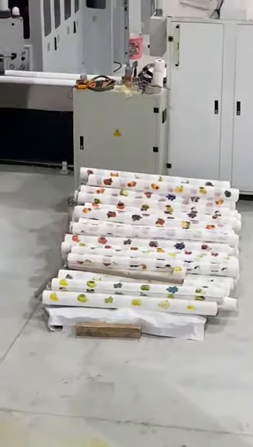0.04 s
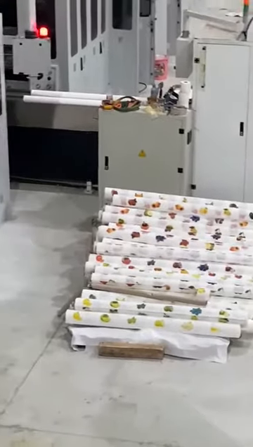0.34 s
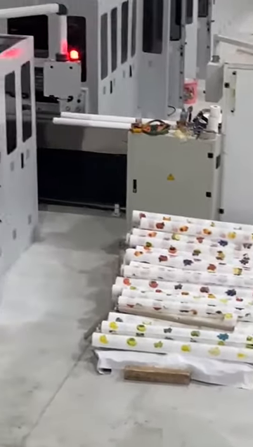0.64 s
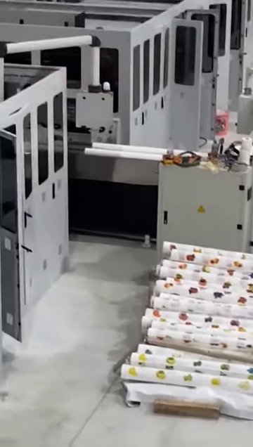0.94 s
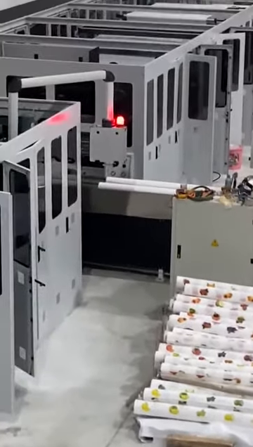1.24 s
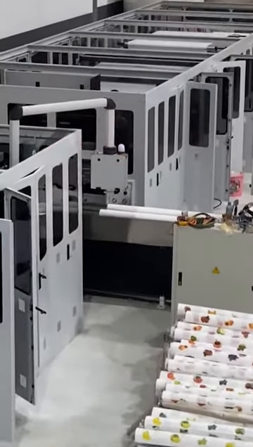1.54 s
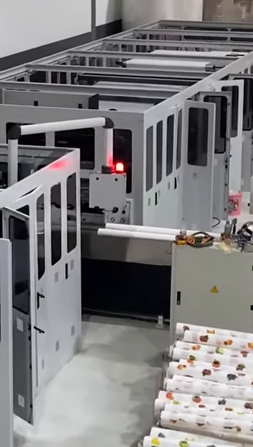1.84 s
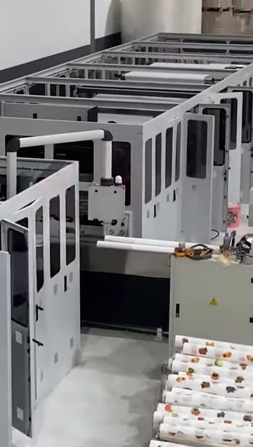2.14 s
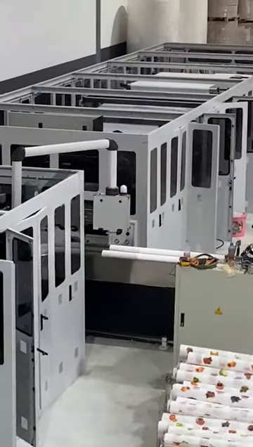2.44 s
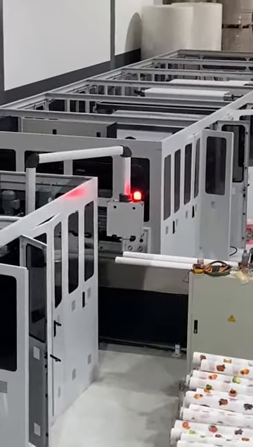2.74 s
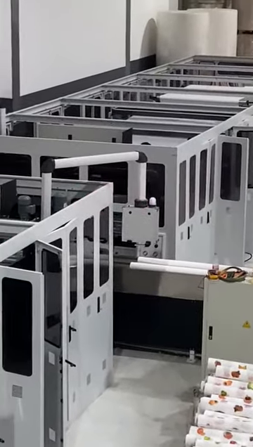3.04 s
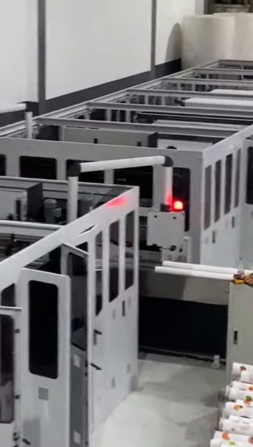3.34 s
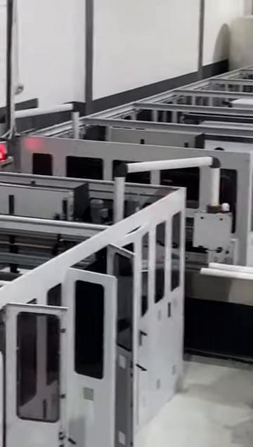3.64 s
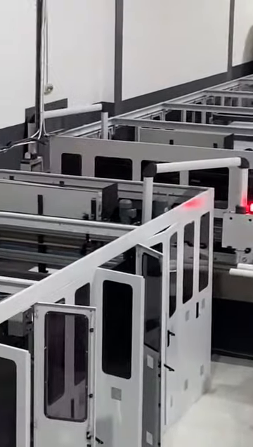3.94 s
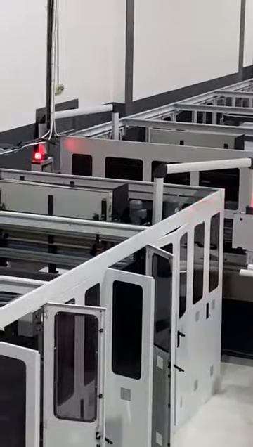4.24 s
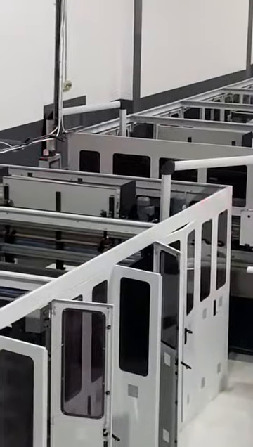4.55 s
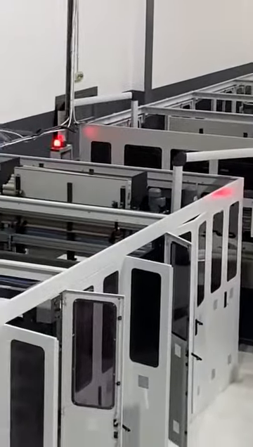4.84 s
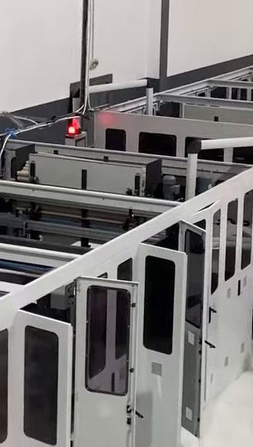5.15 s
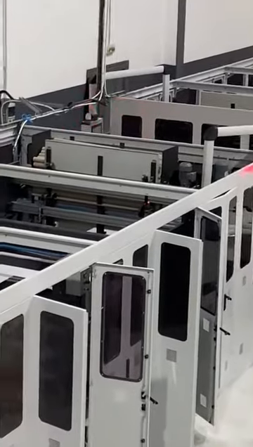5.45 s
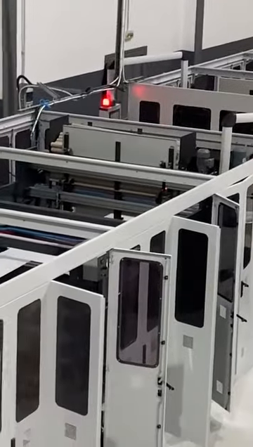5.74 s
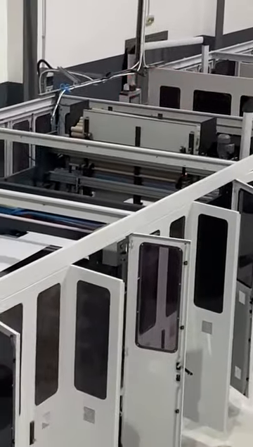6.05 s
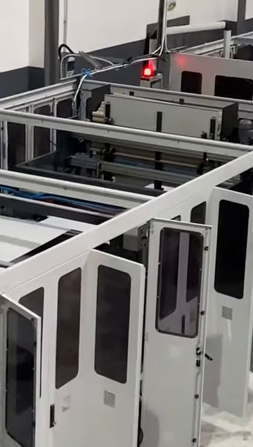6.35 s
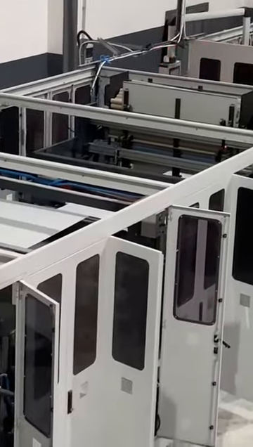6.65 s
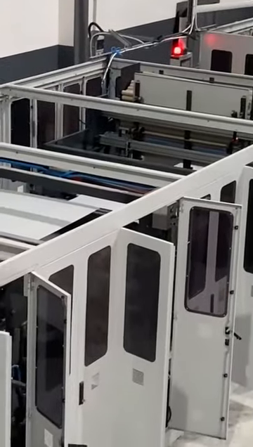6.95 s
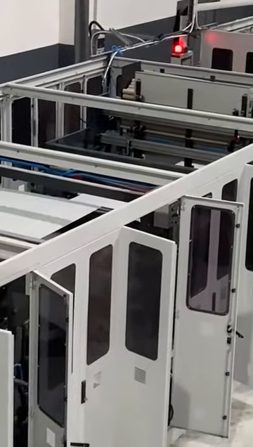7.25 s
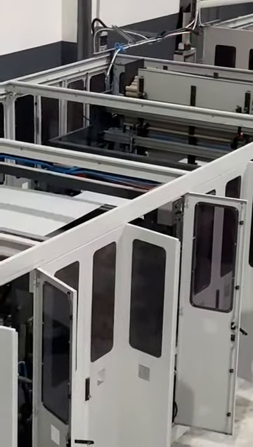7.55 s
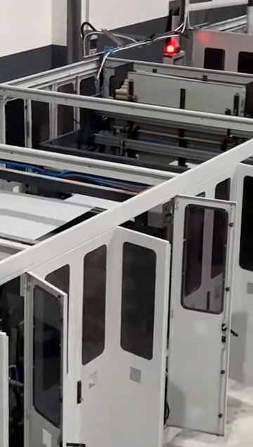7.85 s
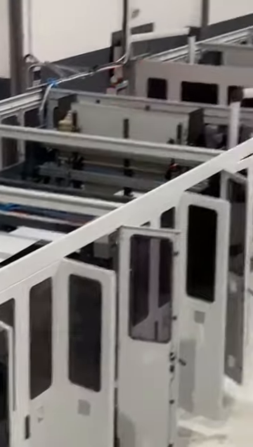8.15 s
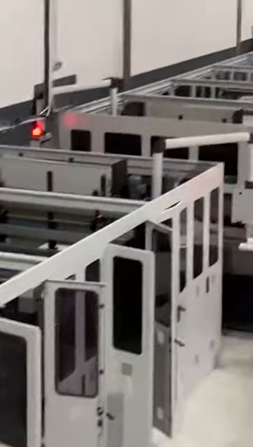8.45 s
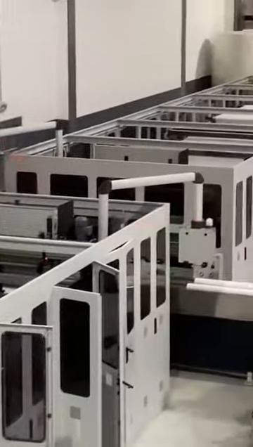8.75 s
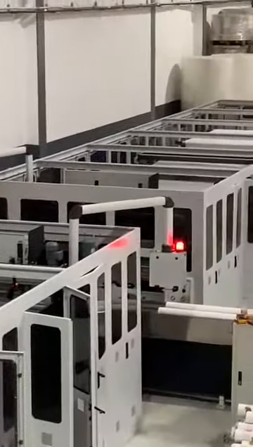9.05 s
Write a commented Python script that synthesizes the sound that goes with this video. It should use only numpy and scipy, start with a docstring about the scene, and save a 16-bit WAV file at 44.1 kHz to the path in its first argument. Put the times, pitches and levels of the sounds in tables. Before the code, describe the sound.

A large paper machine runs at an even speed in a factory hall. Its low hum and throbbing roller rumble dominate, with fainter motor and gear whines and the soft hiss of moving paper above. A panel rings briefly about three seconds in and again later; near the end come faint high squeaks and a soft paper scrape. The whines shift slightly as the microphone turns.

```python
"""Paper line in a factory hall

A paper machine runs at a steady speed, heard from a slowly moving viewpoint above it.
Its main shaft hums and shakes the frame; two drives whine and beat, shifting as the viewpoint turns.
Rollers rumble and the moving sheet of paper hisses. Now and then a dry guide squeaks
or a panel rings, and near the end the paper scrapes over an edge."""
import sys
import numpy as np
from scipy.fft import rfft, irfft, next_fast_len
from scipy.io import wavfile
from scipy.ndimage import map_coordinates

SR = 44100
rng = np.random.default_rng(int(sys.argv[2]) if len(sys.argv) > 2 else 0)


def transcribe(signal):
    """Save signal, clipped to [-1, 1], as a 16-bit WAV file at the path in sys.argv[1]."""
    frames = np.atleast_2d(signal).T
    limited = np.clip(frames, -1, 1)
    pcm = np.round(limited * 32767).astype(np.int16)
    wavfile.write(sys.argv[1], SR, pcm)


N = 410129
TIME = np.arange(N) / SR
SHAFT_HZ, MOTOR_HZ, GEAR_HZ = 12.503, 124.78, 220.5


def amp(db):
    """Turn decibels into a gain."""
    return 10 ** (np.asarray(db) / 20)


def along(points, hz):
    """Read between the (f/Hz, value) rows of a table, with octaves evenly spaced."""
    f, value = np.transpose(points)
    return np.interp(np.log(hz + 1), np.log(f + 1), value)


def wobble(rate):
    """A smooth random curve through `rate` new values a second."""
    times = np.linspace(0, N / SR, 1024)
    curve = map_coordinates(rng.standard_normal(size=512), [times * rate], mode="wrap")
    return np.interp(TIME, times, curve)


def filtered(x, response):
    """Multiply each frequency in x by response(hz)."""
    size = next_fast_len(N + SR // 4, True)
    return irfft(rfft(x, size) * response(np.fft.rfftfreq(size, 1 / SR)), size)[..., :N]


def facing(near_db, far_db):
    """The dB gained as the viewpoint turns to the near unit, then to the far end of the line."""
    def turn(start_s, length_s):
        return np.sin(np.pi / 2 * np.clip((TIME - start_s) / length_s, 0, 1)) ** 2
    return near_db * turn(2.4, 2.4) + far_db * turn(8.05, 0.64)


# How far a tone's phase strays at each microphone: f/Hz, angle/rad
PHASE_STRAY = [(80, .01), (250, 0.053), (600, .11), (900, 0.28), (1200, .26), (1500, 0.41), (2000, .1)]
def tone(hz, drift):
    """A stereo tone whose phase drifts in the hall's standing waves, a little differently per side."""
    cycles = hz * TIME + rng.random()
    phase = 2 * np.pi * (cycles % 1) + drift * wobble(1.595)
    stray = along(PHASE_STRAY, hz) * wobble(1.485)
    return np.sqrt(2) * np.cos([phase + stray, phase - stray])


def whine(hz, db, near_db, far_db):
    """A tone that slowly swells and fades in the hall and follows the turns; high ones waver most."""
    waver_db = 1.54 * hz / 1000 * wobble(5)
    return amp(db + facing(near_db, far_db) + waver_db + 0.8 * wobble(1.28)) * tone(hz, drift=0.2)


# How alike noise is on the left and right: f/Hz, likeness (1 = fully alike)
LIKENESS = [(80, .9999), (200, 1), (400, 0.98), (600, .975), (800, 0.91), (1200, 0.78), (1620, 0.48),
            (2000, 0.98), (2600, 0.99), (3200, .999), (4000, 1), (4450, 0.95), (5000, 0.9), (5400, 1),
            (6000, 0.61), (6600, 1), (8200, 1), (8950, .55), (9900, .998), (11600, 0.96)]
# How far the left side runs ahead: f/Hz, angle/rad
LEFT_LEAD = [(500, 0), (950, .2), (1700, -.3), (2200, .1), (5300, .05), (5650, .65), (6000, 1.55),
             (6350, 2.4), (6600, 3.14), (8200, 3.14), (8650, 3.9), (8950, 4.7), (9300, 5.8), (9900, 6.28)]
def rush(colour):
    """Stereo noise shaped by colour(hz), as two close microphones hear it, scaled to rms 1."""
    def mid_and_side(hz):
        spread = np.arccos(np.clip(along(LIKENESS, hz), -1, 1)) / 2
        return colour(hz) * [np.cos(spread), np.sin(spread)]
    mid, side = filtered(rng.standard_normal((2, N)), mid_and_side)
    pair = np.array([mid + side, mid - side])
    pair = filtered(pair, lambda hz: np.exp(1j * np.array([[.5], [-.5]]) * along(LEFT_LEAD, hz)))
    return pair / np.sqrt(np.mean(pair ** 2))


def noise(points):
    """Stereo noise shaped by a table of f/Hz, relative level/dB."""
    return rush(lambda hz: amp(along(points, hz)))


# The two main hum tones: multiple of the shaft speed, level/dB
HUM_TONES = [(6, -37.7), (12, -40.3)]
def shaft_hum(angle):
    """Six pushes in each turn of the shaft make a low hum."""
    out = np.zeros(N)
    for multiple, db in HUM_TONES:
        level = amp(db + facing(near_db=-0.9, far_db=0.2) + 0.25 * wobble(3.1))
        out += level * np.sqrt(2) * np.cos(round(multiple) * angle)
    return out


# The frame's strongest vibrations: multiple of the shaft speed, level/dB
FRAME_TONES = [(3, -67), (4, -63.5), (5, -56.5), (7, -58.5), (8, -66.5), (9, -54.5), (11, -57), (13, -59.5),
               (14, -64), (15, -64.5), (16, -62), (21, -60), (22, -59.5), (38, -74), (42, -63.5),
               (44, -70.5), (45, -70), (47, -69.5), (48, -68.5), (52, -74), (54, -72.5), (55, -73),
               (58, -71), (59, -76.5), (60, -75), (66, -77), (71, -73.5), (75, -78.5), (80, -79.5),
               (81, -79.5), (93, -75.5), (120, -79), (126, -80)]
def frame():
    """The frame shakes along with the shaft, each tone fading in and out on its own."""
    return sum(amp(db + 2 * wobble(2.6)) * tone(round(multiple) * SHAFT_HZ, drift=0.32)
               for multiple, db in FRAME_TONES)


# The outline of the rattle's many weak tones: f/Hz, relative level/dB
RATTLE_SHAPE = [(320, -75), (600, -77), (900, -78.5), (1200, -83), (1700, -88.5), (2200, -89),
                (2700, -103.5)]
def gear_teeth(angle):
    """The teeth repeat one rattle every turn; it arrives by four paths that slowly trade strength."""
    multiples = np.arange(25, 216)
    one_turn = np.linspace(0, 2 * np.pi, 2048)
    shares = np.array([wobble(0.7) for path in range(4)])
    out = np.zeros(N)
    for share in shares / np.linalg.norm(shares, axis=0):
        sizes = amp(along(RATTLE_SHAPE, multiples * SHAFT_HZ)) * rng.standard_normal(len(multiples))
        phases = 2 * np.pi * rng.random((len(multiples), 1))
        rattle = sizes @ np.cos(multiples[:, None] * one_turn + phases)
        out += 1.4 * share * np.interp(angle % (2 * np.pi), one_turn, rattle)
    return out


# The motor's tones: multiple of its speed, level/dB, near-turn gain/dB, far-turn gain/dB
MOTOR_TONES = [(2, -53, -0.5, -4.5), (4, -66, -0.5, 2), (5, -74, -0.5, -3), (6, -71, 5, 0.5),
               (9, -78, 2, -5), (10, -72.5, -4.5, 9.5), (18, -86, 0, 3), (20, -88.5, 1, 4)]
# How its clearest whines, at 7, 8, 11 and 12 times its speed, swell and fade: t/s, level/dB
SWELL_7 = [(0, -79), (2.2, -75), (2.9, -70), (3.9, -66.5), (4.6, -61.5), (6.2, -62), (6.9, -63.5),
           (7.5, -61), (8.3, -61.5), (9.3, -62)]
SWELL_8 = [(0, -71.5), (1.0, -68), (2.6, -73), (4.2, -73), (4.6, -67), (5.5, -79), (8, -79), (8.3, -68),
           (8.7, -63.5), (9.0, -66.5), (9.3, -64)]
SWELL_11 = [(0, -85), (5, -84), (5.8, -77), (6.8, -79), (7.5, -72), (8, -72.5), (8.4, -76), (9, -70),
            (9.3, -72)]
SWELL_12 = [(0, -79), (1.2, -79), (1.6, -69.5), (3.5, -73.5), (5, -81), (6.5, -75), (7.1, -72), (8, -69.5),
            (8.4, -76), (8.7, -74), (9.3, -76)]
def motor():
    """The drive motor whines at whole multiples of its speed."""
    out = sum(whine(round(multiple) * MOTOR_HZ, *levels) for multiple, *levels in MOTOR_TONES)
    for multiple, swell in ((7, SWELL_7), (8, SWELL_8), (11, SWELL_11), (12, SWELL_12)):
        db = np.interp(TIME, *np.transpose(swell)) + 1.1 * wobble(7)
        out += amp(db) * tone(multiple * MOTOR_HZ, drift=0.2)
    return out


def pinion(teeth):
    """The small gear on the shaft sings at the rate its teeth meet."""
    return whine(teeth * SHAFT_HZ, db=-51.5, near_db=-3, far_db=-1)


# The roller gear's tones: multiple of GEAR_HZ, level/dB, near-turn gain/dB, far-turn gain/dB
GEAR_TONES = [(1, -61.5, 0, 0), (2, -66, 2, 0), (3, -79.5, -1, -3), (4, -68.5, 2.5, 2), (5, -75.5, 1.5, 0)]
def roller_gear():
    """The gear whines; its fourth multiple lies so near the motor's seventh that the two beat."""
    return sum(whine(round(multiple) * GEAR_HZ, *levels) for multiple, *levels in GEAR_TONES)


# Fan and bearing tones: f/Hz, level/dB, near-turn gain/dB, far-turn gain/dB
FAN_TONES = [(83.2, -57.5, 0, 0), (180, -64.5, 0, 0), (417.5, -70.5, 0, 0), (533.2, -74, 0, 0),
             (581.7, -72, 0, 0), (703.5, -70, 3.5, -4), (1185.6, -74, 3, 3), (2074.5, -81, 0, 0)]
def fans():
    """Spinning fans and bearings each add a lone tone."""
    return sum(whine(*row) for row in FAN_TONES)


# The rollers' deep rumble, higher whirr and drumming: f/Hz, relative level/dB
RUMBLE_SHAPE = [(15, -18.5), (33, -19), (43, -3.5), (63, 2), (85, 0), (105, -2), (155, 1), (220, -3.5),
                (285, -8.5), (340, -15), (600, -59)]
WHIRR_SHAPE = [(200, -21), (320, 0.5), (430, 0.5), (620, -5), (880, -5.5), (1050, -18), (1600, -53)]
DRUM_SHAPE = [(150, -38.5), (205, -3), (250, 2), (270, -2), (300, -13), (360, -43.5)]
def rollers():
    """The rollers drum unevenly, and their rumble and whirr throb once per turn of the shaft."""
    throb = np.cos(2 * np.pi * SHAFT_HZ * TIME)
    rumble = amp(-43.5 + 1.1 * throb + 0.7 * wobble(5.5)) * noise(RUMBLE_SHAPE)
    whirr_db = -53.5 + facing(near_db=-0.3, far_db=1.3) + 0.7 * throb + 0.36 * wobble(8.7)
    whirr = amp(whirr_db) * noise(WHIRR_SHAPE)
    drumming = amp(-55 + 2.9 * wobble(7)) * noise(DRUM_SHAPE)
    return rumble + whirr + drumming


# The paper's rush and its high hiss: f/Hz, relative level/dB
RUSH_SHAPE = [(600, -22), (1000, -1), (1280, 2.5), (1430, -2), (1800, -6.5), (2150, -6.5), (2700, -11),
              (3600, -27), (6000, -58)]
HISS_SHAPE = [(1500, -25), (2800, 2.5), (3500, 1.5), (5600, 0.5), (7000, -1.5), (8000, -7), (9000, -9.5),
              (10200, -8.5), (11200, -18), (11800, -30)]
def paper():
    """The sheet rushes over the rollers, loudest toward the far end."""
    rush_db = -61 + facing(near_db=0.85, far_db=2) + 0.43 * wobble(10)
    hiss_db = -64 + facing(near_db=-0.8, far_db=1.1) + 0.08 * wobble(1.6) + 0.17 * wobble(14)
    return amp(rush_db) * noise(RUSH_SHAPE) + amp(hiss_db) * noise(HISS_SHAPE)


def burst(start, db, fade_s, rise_s):
    """The level of a sound that builds up and dies away in the hall, losing 60 dB in fade_s."""
    age = np.maximum(TIME - start, 0)
    return amp(db - 60 * age / fade_s) * (1 - np.exp(-age / rise_s))


def rubbed(events, resonances, rise_s, flutter_db):
    """Rubbing makes a part ring in fluttering bursts of noise; overlapping bursts add their power."""
    def body(f):
        return sum(amp(db) * np.abs(f * width / (hz * hz - f * f + 1j * f * width)) ** 1.7
                   for hz, width, db in resonances)
    swell = np.sqrt(sum(burst(*event, rise_s) ** 2 for event in events))
    return swell * amp(flutter_db * wobble(40)) * rush(body)


# Thin, high squeaks: t/s, f/Hz, level/dB, fade/s
GUIDE_SQUEAKS = [(.42, 9700, -83, .8), (2.86, 9620, -73, 1), (2.97, 9600, -79, .5), (6.1, 9700, -80, 0.91),
                 (8.605, 9750, -71, .35), (8.68, 9600, -73, .5), (8.722, 9720, -62.5, .25),
                 (8.785, 11050, -77, 0.9), (8.805, 9740, -69, .8), (8.84, 11200, -76.5, 1.0),
                 (8.98, 9560, -62, 0.22), (8.99, 11150, -83, 1), (9.0, 9600, -69.5, 1.2)]
def guide(width_hz):
    """Rubbing makes a dry guide squeak in one narrow band, whose pitch varies from squeak to squeak."""
    return sum(rubbed([(start, db, fade_s)], [(hz, width_hz, 0)], rise_s=0.007, flutter_db=0.9)
               for start, hz, db, fade_s in GUIDE_SQUEAKS)


# The panel's brief notes: t/s, f/Hz, level/dB, fade/s
PANEL_NOTES = [(2.87, 385, -50, .5), (2.905, 648, -48.5, 0.6), (3.0, 655, -57, .4), (3.15, 480, -52, .5),
               (7.46, 626, -45.5, 0.7), (7.47, 506, -51, 0.75), (7.47, 1385, -63, 0.83),
               (7.495, 244, -38, .4), (7.595, 622, -52, .45), (7.65, 496, -50, .35), (7.84, 630, -53.5, .5),
               (8.255, 1700, -63, .5)]
def panel():
    """A guard panel rings with an unsteady pitch, each note swelling and fading in the hall."""
    out = np.zeros(N)
    for start, hz, db, fade_s in PANEL_NOTES:
        phase = 2 * np.pi * (hz * TIME + rng.random()) + 0.9 * wobble(22)
        level = burst(start, db, fade_s, rise_s=0.03) * amp(2 * wobble(30))
        out += level * np.sqrt(2) * np.cos(phase)
    return out


# Soft scrapes: t/s, level/dB, fade/s
EDGE_SCRAPES = [(8.8, -65.5, 0.8), (8.966, -59.5, 0.5), (8.99, -56.5, .33), (9.05, -57.5, 0.4),
                (9.12, -64, .9)]
# Where the edge rings: f/Hz, width/Hz, relative level/dB
EDGE_RESONANCES = [(1900, 450, -2), (2310, 420, 1), (2950, 900, -3.5), (5000, 2400, -13)]
def edge():
    """The paper brushes over an edge and stirs its broad resonances."""
    return rubbed(EDGE_SCRAPES, EDGE_RESONANCES, rise_s=0.005, flutter_db=0.6)


# How much louder the left side is than the right: f/Hz, level/dB
BALANCE = [(80, 0), (200, -.9), (400, -1.2), (750, -.2), (1000, 1), (1350, 1.2), (2000, .3), (3000, 0)]
def scene():
    """The whole line, heard at two closely spaced microphones."""
    angle = 2 * np.pi * SHAFT_HZ * TIME + 0.016 * wobble(2)  # how far the shaft has turned
    shaft = shaft_hum(angle) + frame() + gear_teeth(angle)
    drives = motor() + pinion(teeth=23) + roller_gear() + fans()
    hall = shaft + drives + rollers() + paper() + guide(width_hz=340) + panel() + edge()
    return filtered(hall, lambda hz: amp(np.array([[.5], [-.5]]) * along(BALANCE, hz)))


def record(dry):
    """Cut away the very highest treble."""
    return filtered(dry, lambda hz: hz < 11850)


dry = scene()
out = record(dry)
transcribe(out)
```